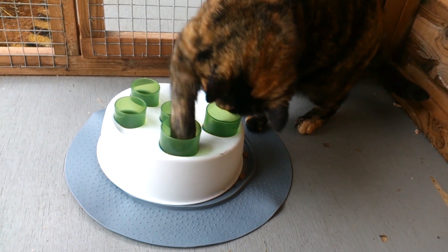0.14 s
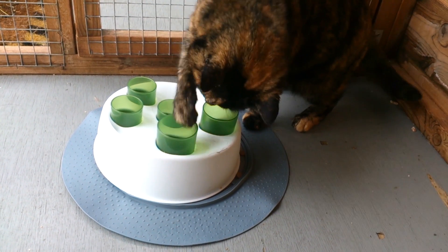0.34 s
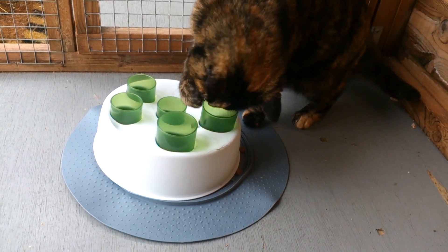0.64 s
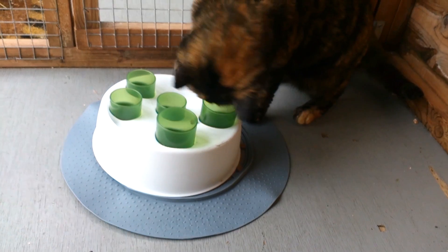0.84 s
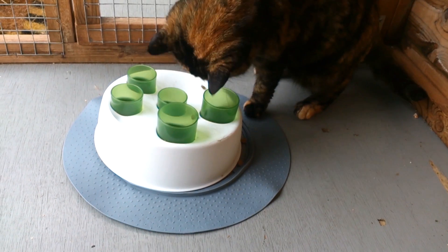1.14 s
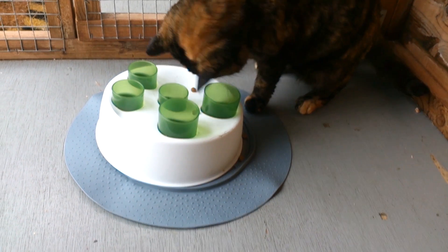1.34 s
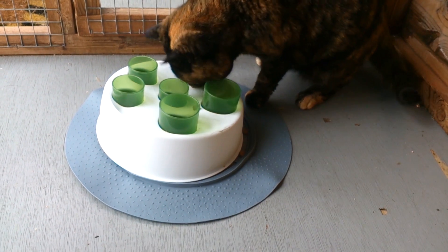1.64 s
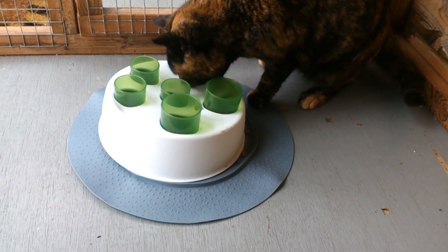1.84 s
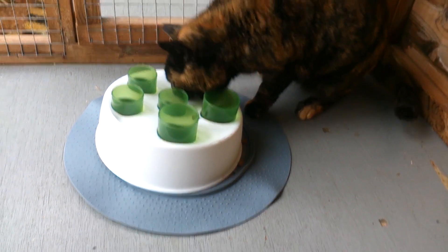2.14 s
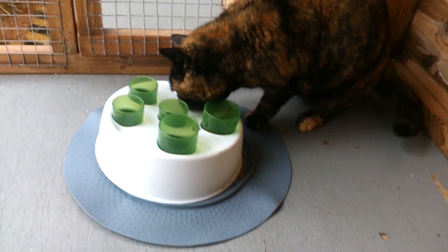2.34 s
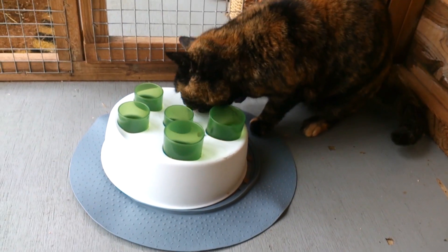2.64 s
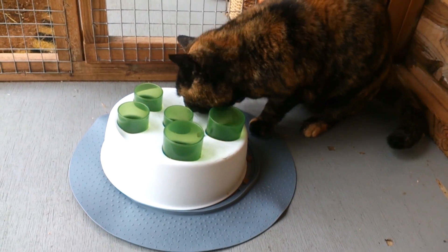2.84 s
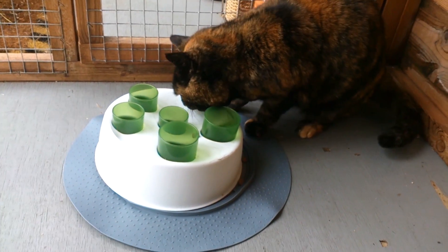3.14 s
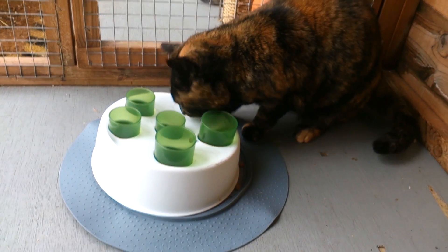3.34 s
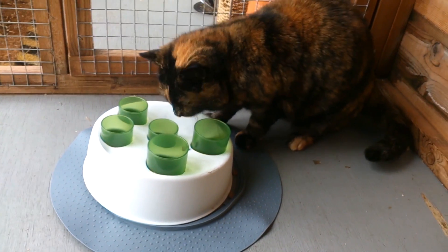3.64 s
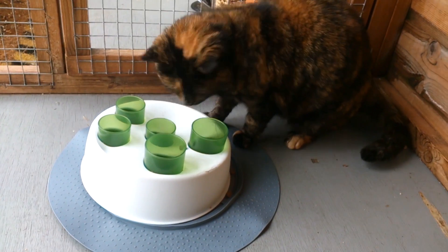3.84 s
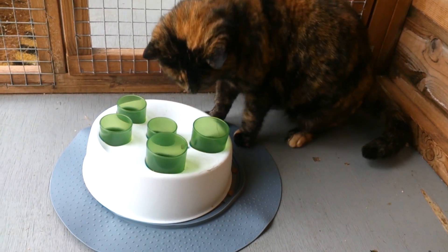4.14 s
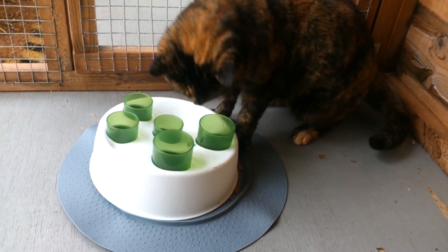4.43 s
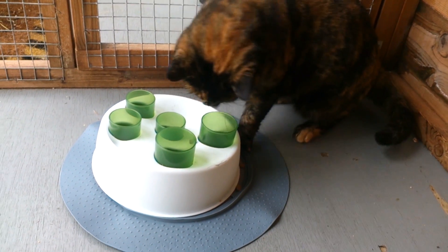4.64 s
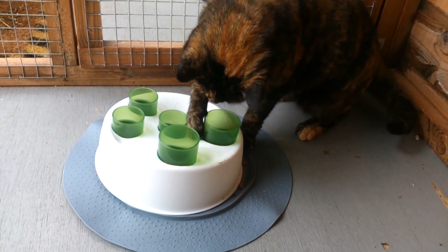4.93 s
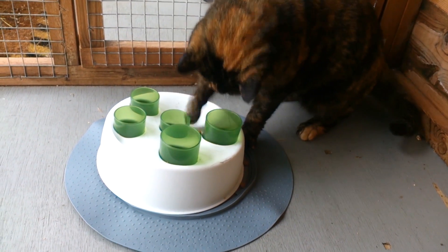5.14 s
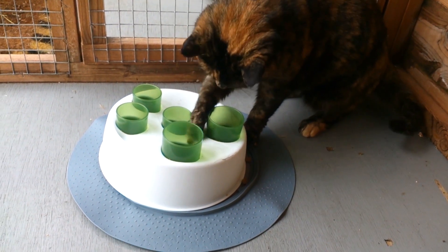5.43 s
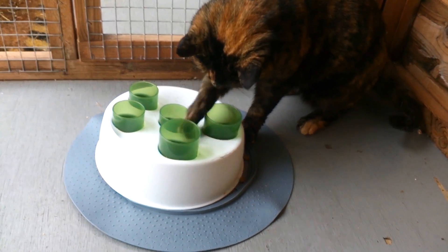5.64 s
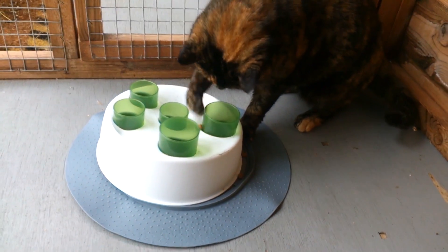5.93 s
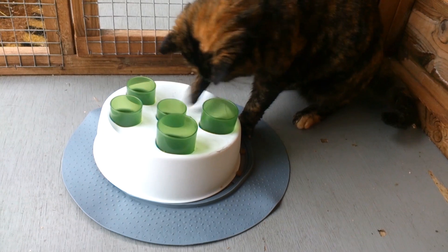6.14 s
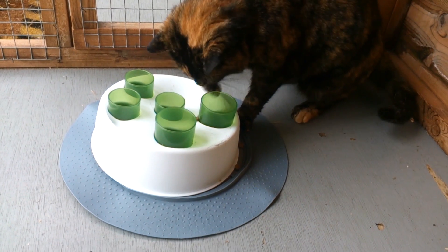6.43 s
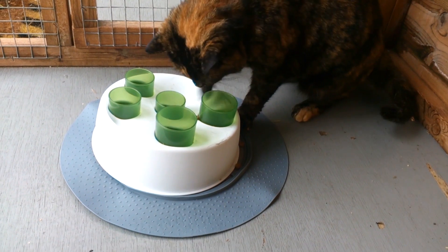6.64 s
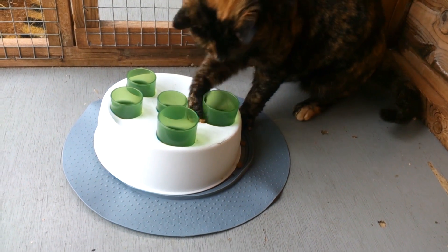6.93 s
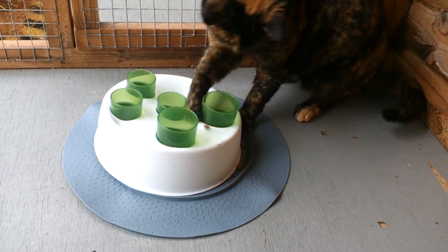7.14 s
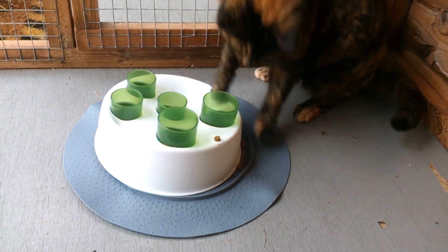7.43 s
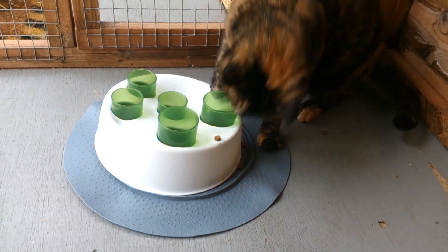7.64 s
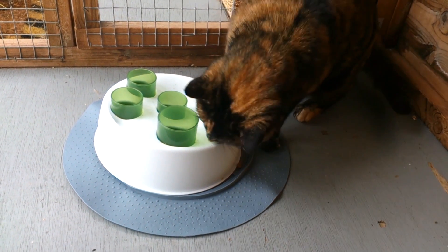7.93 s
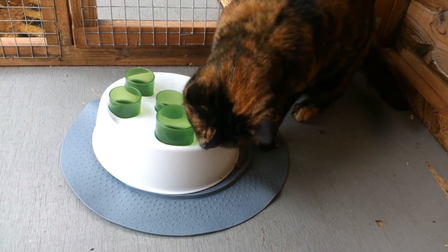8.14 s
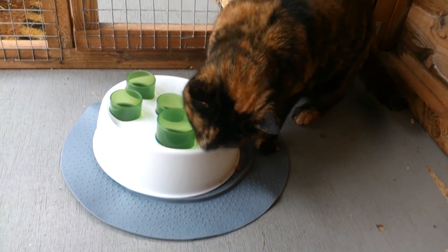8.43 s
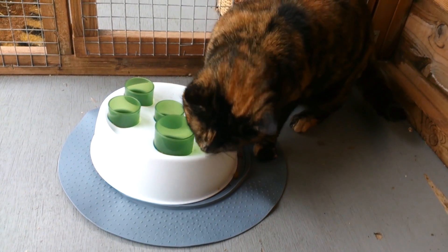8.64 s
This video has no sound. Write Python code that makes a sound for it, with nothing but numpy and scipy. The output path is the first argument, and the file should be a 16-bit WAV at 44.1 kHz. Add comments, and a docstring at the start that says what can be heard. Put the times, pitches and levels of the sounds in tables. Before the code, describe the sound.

Sparse plastic clicks, soft paw thumps and dry scrapes as a purring cat works a food puzzle, with low rumble and occasional bumps on the microphone.

```python
"""A cat paws kibble out of a plastic feeder in a wooden pen, a metre from a hand-held camera.
From the start a hollow rumble (filtered noise) swells, a motor hums (sines), the right port hisses and whines,
and the cat purrs in bouts (pulses ringing resonances). Fur and kibble scrape (noise grains, ringing ticks),
the base rubs on its mat (resonant noise), paws thump the floor (decaying sines) and kibble and claws tap
the plastic (decaying noise and modes); later fingers knock the camera near its right port."""
import sys
import numpy as np
from scipy import signal
from scipy.fft import rfft, irfft, next_fast_len
from scipy.io import wavfile
from scipy.ndimage import uniform_filter1d

SR = 44100
rng = np.random.default_rng(int(sys.argv[2]) if len(sys.argv) > 2 else 0)


def inscribe(sig):
    """Save sig as 16-bit PCM at rate SR to the path in sys.argv[1].

    A 1-D sig is mono; a 2-D sig holds one channel per row.
    Samples are clipped to [-1, 1] before scaling.
    """
    pcm = np.round(np.clip(np.atleast_2d(sig).T, -1, 1) * 32767)
    wavfile.write(sys.argv[1], SR, pcm.astype(np.int16))


def ratio(d):
    """dB to gain"""
    e = np.asarray(d, float) / 20
    return 10 ** e


N = 386757
T = np.arange(N) / SR  # time [s]
# modes of the hollow base and tubes: (frequency [Hz], relative level [dB], free t60 [s])
HOLLOW_MODES = [(842, -21.5, 0.41), (1080, -15, 0.29), (1455, -24, 0.16), (1767, -22, 0.16),
                (1950, -16, 0.059), (2600, -22.5, 0.1), (3350, -24, 0.077), (3780, -24.5, 0.15),
                (4570, -23, 0.1), (5170, -24, 0.12)]


def colour(x, points):
    """Linear filtering: weight the spectrum along the last axis by (frequency [Hz], gain [dB]) points."""
    hz, db = np.transpose(points)
    size = next_fast_len(x.shape[-1])
    log_f = np.log(np.arange(size // 2 + 1) * SR / size + 1)
    gain = ratio(np.interp(log_f, np.log(hz), db, db[0] - 49))
    return irfft(rfft(x, size) * gain, size)[..., :x.shape[-1]]


def level(x, db):
    """Mean-square power: scale to an rms level."""
    return x * ratio(db) / np.sqrt(np.mean(x ** 2))


def pair(points, alike_hz):
    """Spatial coherence: coloured noise of 0 dB rms, alike at both ports well below alike_hz."""
    mid, side = colour(rng.standard_normal((2, N)), points)
    side = signal.lfilter(*signal.butter(1, alike_hz, "high", fs=SR), side)
    return level(np.array([mid + side, mid - side]), 0)


def walk(rate):
    """Slow random modulation: normal draws held 1 / rate s, then smoothed twice over that time."""
    k = int(SR / rate)
    held = np.repeat(rng.standard_normal(N // k + 1), k)
    return uniform_filter1d(uniform_filter1d(held, k), k)[:N]


def add(track, s, sound, peak_db):
    """Superposition: lay a sound on a track at a time, scaled to its peak."""
    i = int(s * SR)
    sound = sound[..., :N - i]
    track[..., i:i + sound.shape[-1]] += sound * ratio(peak_db) / np.abs(sound).max()


def fade(t, t60):
    """Exponential damping: down 60 dB after t60 s."""
    return np.exp(-np.log(1000) * t / t60)


def ring(t, hz, t60):
    """Free vibration of one damped mode: decaying sine."""
    return np.sin(2 * np.pi * hz * t) * fade(t, t60)


def drag_force(s, length):
    """Sliding friction: the force of a drag swells, holds and eases off over shares of its length."""
    attack, release = 0.086, 0.42
    return np.interp((T - s) / length, [0, attack, 1 - release, 1], [0, 1, 1, 0])


def hollow_rumble(low_db=-62, follow=0.2):
    """Filtered noise: a hollow rumble swells and sinks, source uncertain; its low part follows less."""
    # hollow part before its random wavering and the port tilt: (time [s], level [dB])
    swells = [(0.0, -68.5), (0.4, -65), (1.76, -71), (2.44, -72), (2.73, -74.5), (4.4, -77), (4.67, -65),
              (5.57, -76), (6.06, -62.5), (6.3, -79.5), (6.64, -68), (7.64, -74.5), (7.96, -67.5),
              (8.77, -72)]
    # spectra: (frequency [Hz], relative density [dB per Hz])
    low_tone = [(15, -1.5), (33, 6.5), (42, -17), (60, -6), (80, -4), (105, 1.5), (250, -13), (400, -36)]
    hollow_tone = [(200, -29), (300, 4), (420, -3), (495, 1.5), (580, -10), (700, -9.5), (810, -15.5),
                   (1100, -22), (2200, -47)]
    hollow_db = np.interp(T, *np.transpose(swells))
    follow_db = follow * (hollow_db - hollow_db.mean())
    low = pair(low_tone, 160) * ratio(low_db + follow_db + 2 * walk(15))
    hollow = pair(hollow_tone, 700) * ratio(hollow_db + 2.5 * walk(12))
    return low + hollow


def air_noise():
    """Stationary random noise: steady, broad, and coherent between the ports at low frequencies."""
    # spectrum: (frequency [Hz], relative density [dB per Hz])
    air_tone = [(250, 6), (350, -1), (700, -1.5), (1300, -6.5), (2500, -8), (4700, -10.5), (5600, -30),
                (8500, -29), (10000, -18), (16000, -27)]
    return ratio(-69.5) * pair(air_tone, 730)


def motor():
    """Periodic rotation: hum partials share one wavering speed, and each wavers in level."""
    # partials before wavering and port tilt: (frequency [Hz], rms level [dB])
    partials = [(49, -50.5), (99, -72), (343, -79)]
    turns = T + np.cumsum(0.025 * walk(15)) / SR  # time warped by the wavering speed
    hum = 0
    for hz, db in partials:
        wavering_db = db + 0.91 * walk(2.26) + 1.17 * walk(25)
        hum = hum + np.sqrt(2) * ratio(wavering_db) * np.sin(2 * np.pi * hz * turns)
    return hum


def electronics():
    """Electronic noise and frequency modulation: treble hiss and whines, on the right port only."""
    # hiss spectrum: (frequency [Hz], relative density [dB per Hz])
    hiss_tone = [(4200, -15), (4600, -4.5), (5200, -7.5), (5500, -13.5), (8600, -13), (9000, 2.5),
                 (12000, 0.5), (15000, 5), (16000, -17)]
    # wavering whines: (mean frequency [Hz], wavering scale [Hz], rms level [dB])
    whines = [(14200, 120, -77), (14700, 120, -76)]
    sound = level(colour(rng.standard_normal(N), hiss_tone), -58)
    sound = sound + ratio(-61.0) * np.sin(2 * np.pi * 9717.5 * T)  # steady whine
    for hz, width, db in whines:
        phase = 2 * np.pi * np.cumsum(hz + width * walk(330)) / SR
        sound = sound + np.sqrt(2) * ratio(db) * np.sin(phase)
    return sound * np.array([[0], [1]])


def purr():
    """Source and filter: the larynx flutters; each snap rings chest and throat and lets out a puff of air."""
    # bouts before the port tilt: (start [s], length [s], nominal level [dB], mean pulse rate [Hz])
    bouts = [(0.0, 0.44, -64, 25.88), (0.549, 1.14, -62.5, 25.56), (1.747, 0.91, -63, 26.23),
             (3.001, 0.36, -70.5, 25.33), (4.45, 1.08, -62, 25.4), (5.6, 0.74, -65, 25.55),
             (6.354, 0.86, -65.5, 25.6), (7.199, 0.34, -66, 25.6), (7.605, 0.77, -64.5, 25.92)]
    # chest and throat resonances: (frequency [Hz], relative level [dB], t60 [s])
    chest = [(99.5, 0, 0.077), (183, 4, 0.038), (258.6, -2.5, 0.03), (346, -17, 0.064), (500, -7.5, 0.021)]
    edge_s, jitter, size_spread_db = 0.078, 0.0178, 2.0  # jitter as a share of the period
    snaps, t = np.zeros(N), T[:4096]
    for s, length, db, hz in bouts:
        chance = rng.standard_normal((40, 2))
        when = np.cumsum(1 + jitter * chance[:, 0]) / hz
        edges = np.clip(np.minimum(when, length - when) / edge_s, 0, 1)
        size = ratio(db + size_spread_db * chance[:, 1]) * edges
        snaps[np.minimum(((s + when) * SR).astype(int), N - 1)] += size
    body = sum(ratio(db) * ring(t, hz, t60) for hz, db, t60 in chest) * (1 - np.exp(-t / 0.015))
    body = body * np.sqrt(SR / 25.5 / np.sum(body ** 2))  # unit rms at 25.5 unit pulses a second
    puff_tone = [(150, -15), (330, 4.5), (520, 1.5), (900, -36.0)]
    puff = level(colour(rng.standard_normal(N), puff_tone), 1)
    gate = signal.fftconvolve(snaps, fade(t, 0.048))[:N]
    return signal.fftconvolve(snaps, body)[:N] + puff * gate


def scrapes(patchy_db=9.5, smear=0.0047):
    """Stick-slip friction: dense uneven grains, blurred by the pen, and kibble ticking on the modes."""
    # fur and kibble dragged over plastic: (start [s], length [s], rub level before the port tilt [dB])
    drags = [(0.04, 0.66, -76.5), (1.883, 0.71, -74.5), (2.394, 1.3, -85), (5.092, 0.2, -69.5),
             (5.234, 1.3, -77.5), (7.107, 0.27, -63.5), (7.73, 0.15, -69), (7.913, 0.51, -75)]
    ticks_per_s, tick_db, tick_spread_db = 110, 1, 5  # tick_db: rms level against 0 dB for the rub
    grains = uniform_filter1d(rng.standard_normal(N) ** 4, int(smear * SR)) ** 0.5
    grains = grains * ratio(patchy_db * walk(30))
    rub_tone = [(600, -57), (1600, 12), (4000, 3.0), (7000, 0), (12000, -32)]
    rub = level(grains * pair(rub_tone, 800), 0)
    ticks = (rng.random(N) < ticks_per_s / SR) * ratio(tick_spread_db * rng.standard_normal(N))
    # the modes decay faster here than when struck
    modes = sum(ratio(db) * ring(T[:4096], hz, 0.39 * t60) for hz, db, t60 in HOLLOW_MODES[2:])
    ticking = level(signal.fftconvolve(ticks, modes)[:N], tick_db)
    force = sum(ratio(db) * drag_force(s, length) for s, length, db in drags)
    return (rub + ticking) * force


def rubs(patchy_db=4):
    """Resonance: juddering friction drives two air resonances under the base as it rubs on its mat."""
    # drags before the port tilt: (start [s], length [s], lower level [dB], upper over lower [dB])
    pushes = [(0.073, 0.58, -66, -6), (1.765, 0.64, -63, -35), (2.274, 0.43, -65.5, -22),
              (4.47, 0.66, -75, -5), (5.2, 0.26, -81.5, 8), (5.846, 0.57, -69.5, -16)]
    # (lower [Hz], upper [Hz]): centres, then bandwidths
    centres = (498, 735)
    widths = (60, 18)
    judder = rng.standard_normal(N) * ratio(patchy_db * walk(35))
    low, high = (level(signal.lfilter(*signal.iirpeak(hz, hz / width, SR), judder), 0)
                 for hz, width in zip(centres, widths))
    out = 0
    for s, length, db, upper_db in pushes:
        out = out + ratio(db) * drag_force(s, length) * (low + ratio(upper_db) * high)
    return out


def paws(t60=0.065):
    """Soft impact: a pad presses slowly and sets two modes of the floor board booming."""
    # before the port tilt: (time [s], peak level [dB], lower mode [Hz])
    thumps = [(0.169, -41.5, 153), (0.755, -48, 107), (4.761, -43, 99), (5.12, -42, 106.5),
              (5.346, -44.5, 96), (5.627, -42.5, 104), (7.114, -43.5, 110), (7.427, -40, 88.5),
              (7.995, -46, 103)]
    out, t = np.zeros(N), T[:8192]
    press = 1 - np.exp(-(t / 0.012) ** 2)
    for s, peak_db, hz in thumps:
        boom = ring(t, hz, t60) + 1.1 * ring(t, 1.725 * hz, 0.57 * t60)
        add(out, s, press * boom, peak_db)
    return out


def response(t, drag, wet_db, lag_s=0.0004):
    """Modal density and reverberation: one touch stirs many plastic modes, then boards, floor and wall."""
    # feeder modes too close to tell apart: (frequency [Hz], t60 before the drag is added [s])
    plastic_t60 = [(500, 0.17), (2000, 0.019), (5000, 0.032), (12000, 0.0063)]
    # echo of the pen: (frequency [Hz], t60 before the drag is added [s])
    pen_t60 = [(500, 0.17), (2000, 0.21), (5000, 0.18), (10000, 0.093)]
    noise, out = rng.standard_normal((3, len(t))), 0
    for f in 350 * 2 ** np.arange(7):  # octave bands
        band = colour(noise, [(f / 2, -40), (f / 1.5, -3), (f, 0), (f * 1.33, -3), (f * 2, -40), (f * 3, -90)])
        body = band[0] * fade(t, drag + np.interp(f, *np.transpose(plastic_t60)))
        echo_decay = fade(t, drag + np.interp(f, *np.transpose(pen_t60)))
        echo = band[1:] * ratio(wet_db) * (1 - np.exp(-t / 0.00013)) * echo_decay
        both_ports = np.array([body, np.roll(body, int(lag_s * SR))])  # later at the right port
        out = out + echo + both_ports
    return out


def taps(tube_gain=0.46, tube_db=0.59, tube_q=8, longest=0.057, drag=0.0013, drag_db=-0.06, lead=0.0016,
         spot_db=3):
    """Impact excitation: each touch sets off plastic and pen; the struck tube's air column stands out."""
    # kibble and claws on plastic, before the port tilt:
    # (time [s], peak level [dB], pitch [Hz], hollow part gain [dB], bright part gain [dB])
    touches = [(0.2505, -42, 4000, 18, 0), (0.3183, -46.5, 3580, -11, -2), (0.398, -43, 770, 10, -5),
               (0.5162, -20, 2680, -7.5, 1.5), (1.0448, -13, 1810, -19, -9.5), (1.1083, -30, 1530, -9, -17),
               (1.274, -48, 1510, 1, -14), (1.3079, -49.5, 1090, -10, -10), (1.3454, -44, 1080, -7, -3),
               (2.2367, -27.5, 4300, -7.5, -7), (2.461, -55, 1770, -12, -17), (2.678, -51, 1690, 14, -25),
               (2.9192, -49, 1000, 0, -32), (3.173, -57.5, 1900, -15, -20), (4.4907, -49.5, 2170, 12, -12),
               (4.709, -51.5, 1580, 7, -17), (4.7625, -46, 2530, -24, -23), (4.7936, -42.5, 3300, 5, -3),
               (5.069, -44, 5780, -2, -6), (5.077, -32.5, 5600, 7, 0.5), (5.096, -35, 3320, -4, -10),
               (5.115, -43, 2670, -16, -14), (5.1541, -46, 2600, -12, -8), (5.2588, -43.5, 1680, 6, -6),
               (5.3916, -50, 3300, -11, -4), (5.439, -50.5, 2670, -12, -7), (5.5658, -47.5, 1180, 23, -6),
               (5.689, -32, 3470, 4.5, 3), (5.9194, -45.5, 5500, -32, 2), (6.0983, -42.5, 2230, 12, -14),
               (6.2082, -45.5, 1860, 18.5, 0), (7.071, -40, 2260, 6.5, -3), (7.112, -33, 2650, -15, -10),
               (7.1477, -32, 1770, -34, -15), (7.184, -44, 1870, -23, -22), (7.245, -40.5, 1740, -22, -15),
               (7.271, -43, 1770, -10, -8), (7.7508, -47.5, 3160, -23, -22), (7.954, -52, 1800, 5, -17),
               (8.047, -48.5, 1460, 6, -15), (8.6318, -38.5, 1550, 7.5, -21)]
    hard_db, echo_db, echo_per_db = -19, -6.5, 0.26  # peak of a hard blow; its echo; more echo per dB softer
    reach_db_per_octave = 11.5  # modes far from the pitch of a blow are driven less
    out, t = np.zeros((2, N)), T[:11264]
    for s, peak_db, ring_hz, hollow_db, bright_db in touches:
        softer = hard_db - peak_db
        # each spot drives the modes in its own mix
        spot = spot_db * rng.standard_normal(len(HOLLOW_MODES))
        dome = 0
        for (hz, db, t60), spot_gain in zip(HOLLOW_MODES, spot):
            reach_loss = reach_db_per_octave * abs(np.log2(hz / ring_hz))
            dome = dome + ratio(db + spot_gain - reach_loss) * ring(t, hz, t60)
        drag_s = min(longest, drag * ratio(drag_db * softer))
        sound = response(t, drag_s, echo_db + echo_per_db * softer) + dome
        sound = np.pad(sound, ((0, 0), (int(lead * SR), 0)))  # room ahead for the zero-phase colouring
        # the softer the touch, the more of the tube
        tube = signal.lfilter(*signal.iirpeak(ring_hz, tube_q, SR), sound)
        sound = sound + tube_gain * ratio(tube_db * softer) * tube
        tone = [(300, hollow_db - 1.5), (750, hollow_db), (1400, 0.37), (3000, 1.25),
                (8500, bright_db), (12000, bright_db + 1), (16000, bright_db - 26)]
        add(out, s - lead, colour(sound, tone), peak_db)
    return out


def knocks(rise=0.00044, t60=0.15, creak_db=-15, creak_hz=1300):
    """Structure-borne sound: a push swings the diaphragm in and slowly out; the shell clacks and creaks on."""
    # fingers on the camera body:
    # (time [s], right-port peak [dB], time until the swing turns outward [s], clack gain against swing [dB])
    blows = [(1.382, -44.5, 0.0063, -27), (2.1633, -26, 0.005, 1), (2.1784, -17.5, 0.0043, 5),
             (3.042, -44, 0.0084, -10), (8.449, -38.5, 0.004, 15), (8.4572, -36, 0.0033, 15),
             (8.5213, -23, 0.0055, 8)]
    # camera body modes: (frequency [Hz], relative level [dB], t60 [s])
    shell_modes = [(306, -1, 0.014), (675, 3.5, 0.0068), (1340, 0, 0.0082), (1910, -6, 0.0088),
                   (4180, -14.5, 0.0063)]
    out, t = np.zeros(N), T[:4096]
    clack = -sum(ratio(db) * ring(t, hz, ring_s) for hz, db, ring_s in shell_modes)
    for s, peak_db, push, clack_db in blows:
        swing = -np.sin(np.pi * (t / push) ** 0.44) * t / push * np.exp(1 - t / push)
        creak = signal.lfilter(*signal.butter(2, creak_hz, fs=SR), rng.standard_normal(len(t)))
        creak = level(creak, creak_db) * fade(t, t60)
        shell = (ratio(clack_db) * clack + creak) * (1 - np.exp(-t / rise))
        add(out, s, swing + shell, peak_db)
    return out * ratio(np.array([[-26], [0]]))  # left and right port [dB]


def grip_tilt(air):
    """Diffraction: the grip tilts the balance of the ports, half the difference going to each."""
    # (frequency [Hz], right port over left [dB])
    right_over_left = [(50, 1.6), (300, 3), (1300, 5), (2400, 4), (4400, 0), (8000, -4), (16000, -3)]
    half = np.array([(0.7, 0.031)] + right_over_left) * [1, 0.5]
    return np.array([colour(air[0], half * [1, -1]), colour(air[1], half)])


def scene():
    """Superposition: airborne sounds, tilted by the grip, plus what the camera itself bears."""
    ambience = hollow_rumble() + air_noise() + motor()
    air = ambience + purr() + scrapes() + rubs() + paws() + taps()
    return grip_tilt(air) + electronics() + knocks()


def roll_off(x):
    """The treble ends steeply here."""
    return signal.sosfilt(signal.butter(12, 16420, fs=SR, output="sos"), x)


def record(dry):
    """Band limitation: the camera cuts the top with a steep elliptic low-pass at 15750 Hz."""
    low_pass = signal.ellip(8, 0.2, 60, 15750, fs=SR, output="sos")
    mix = signal.sosfilt(low_pass, dry)
    return roll_off(mix)


dry = scene()
out = record(dry)
inscribe(out)
```